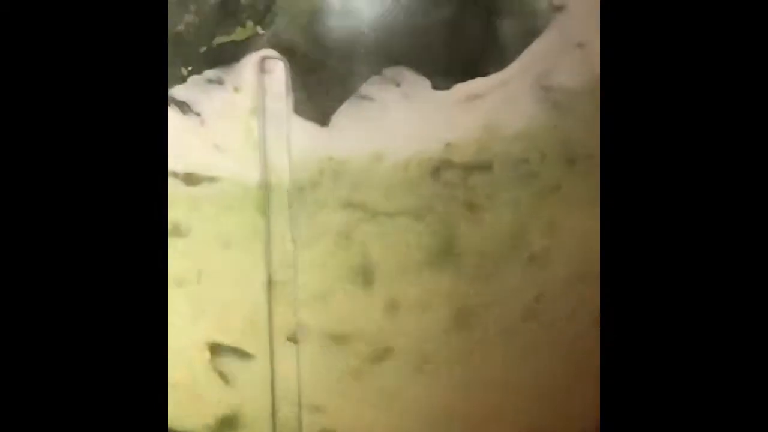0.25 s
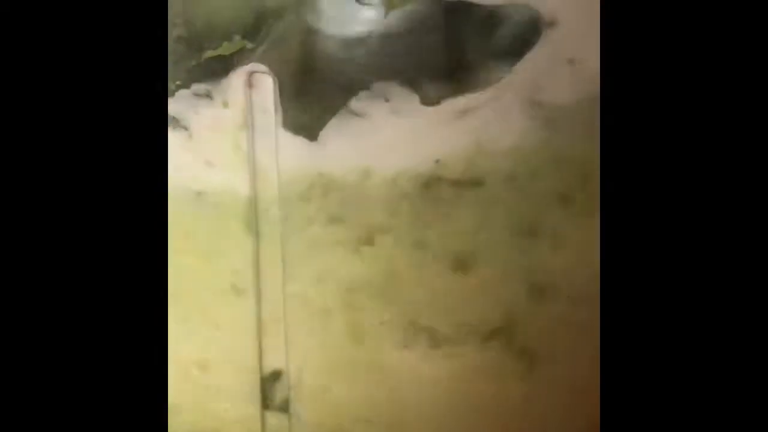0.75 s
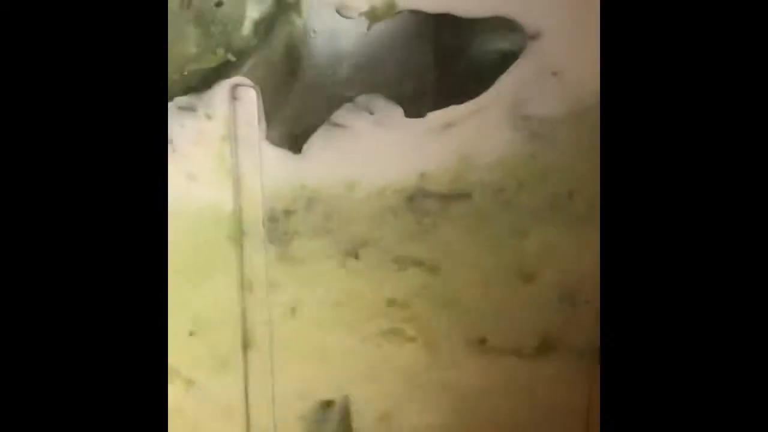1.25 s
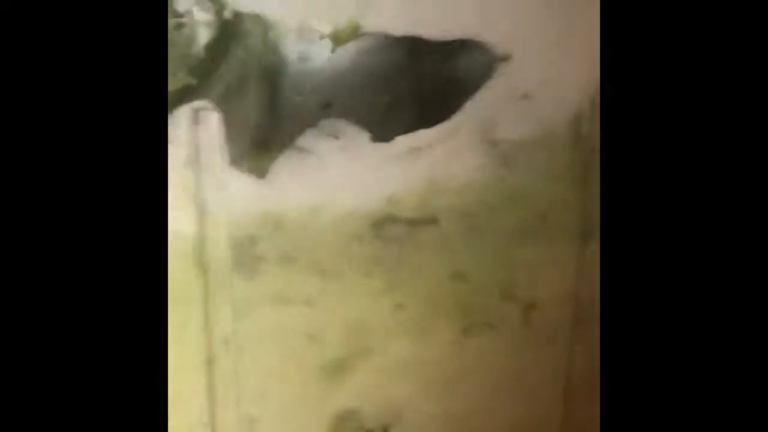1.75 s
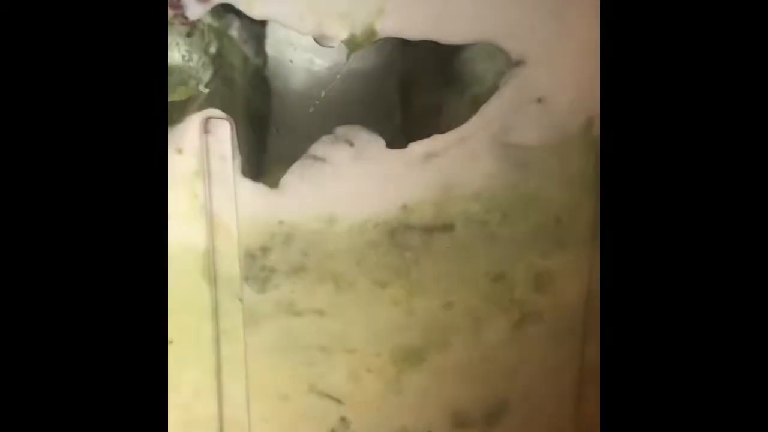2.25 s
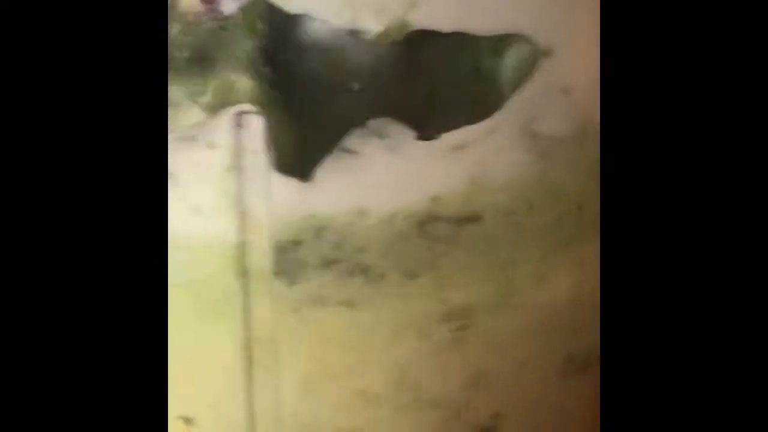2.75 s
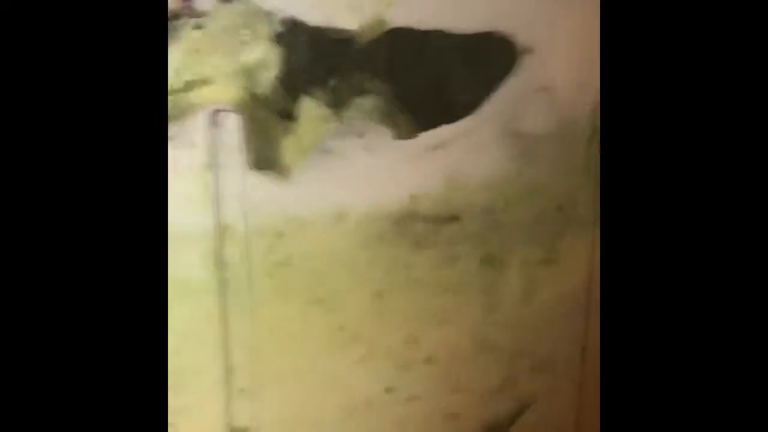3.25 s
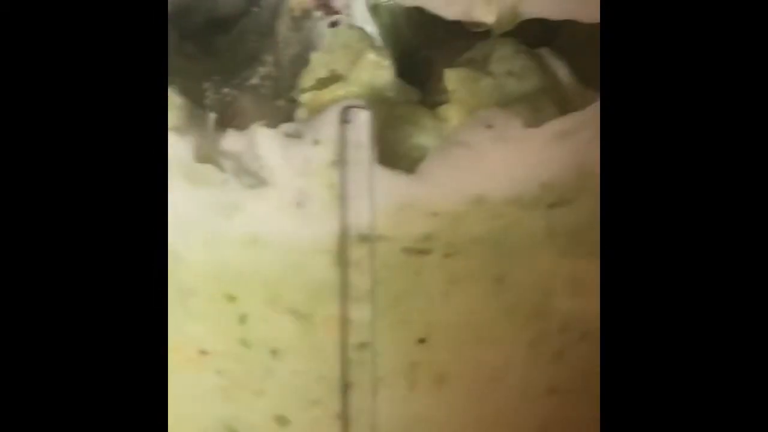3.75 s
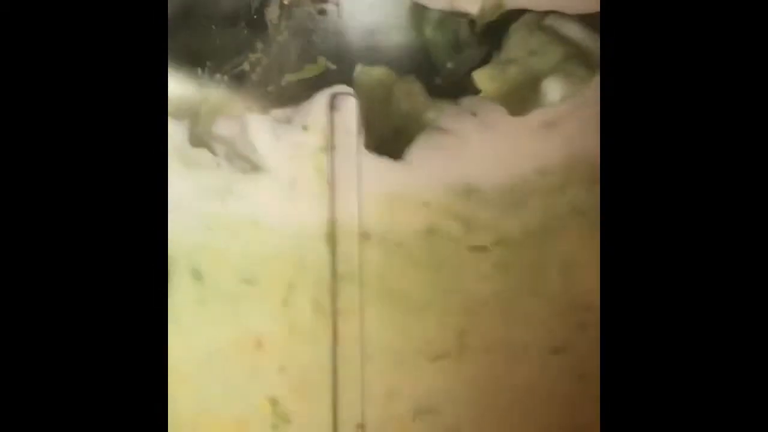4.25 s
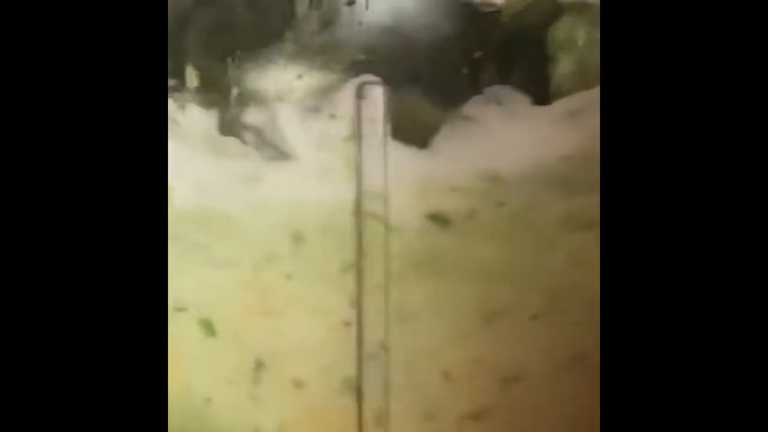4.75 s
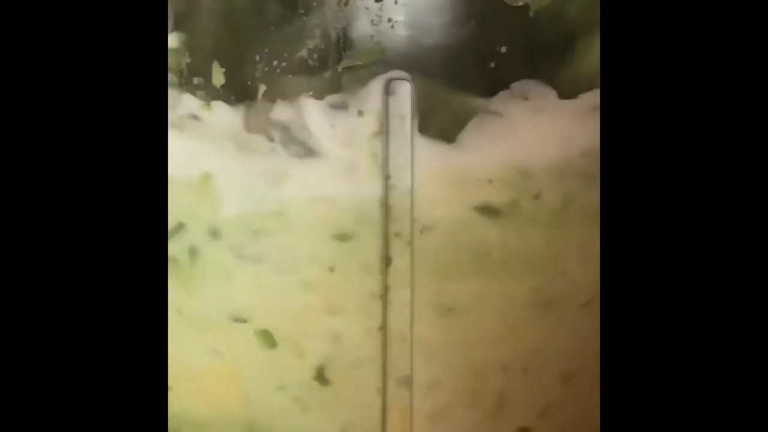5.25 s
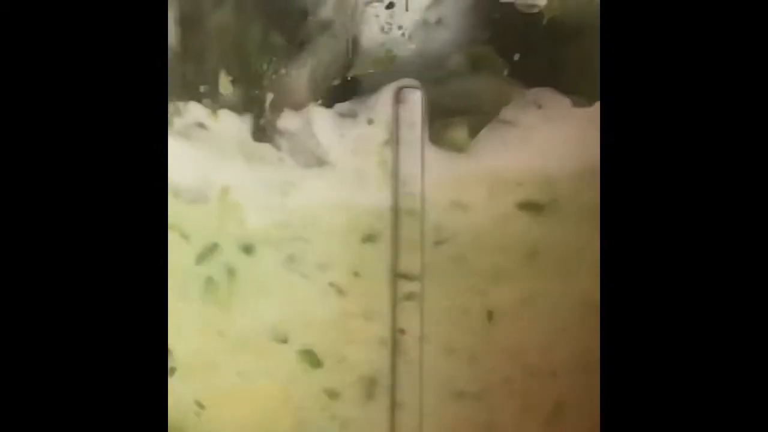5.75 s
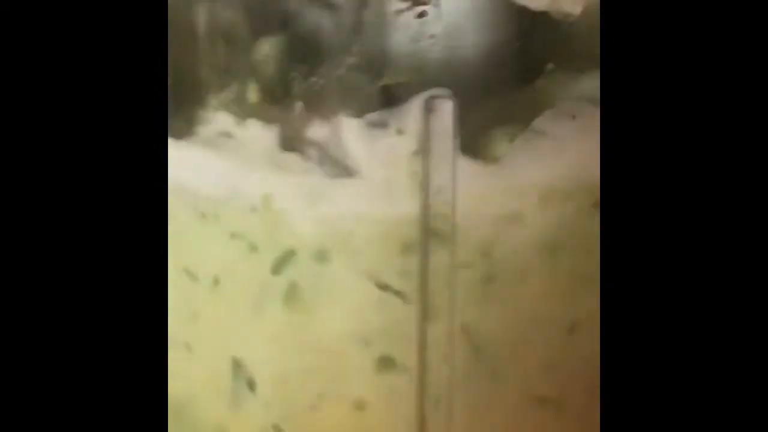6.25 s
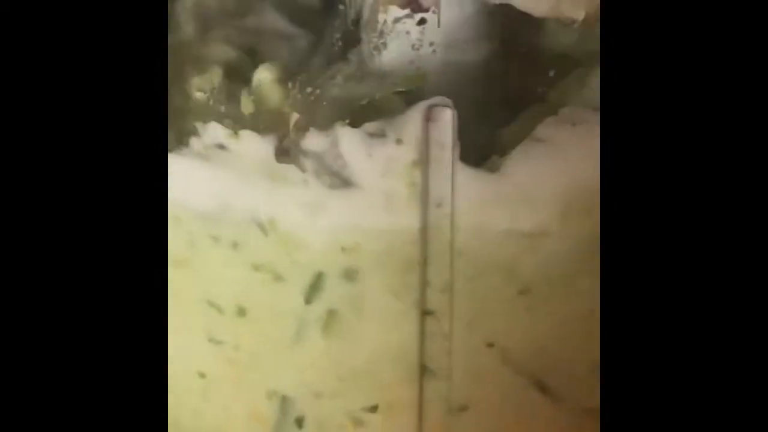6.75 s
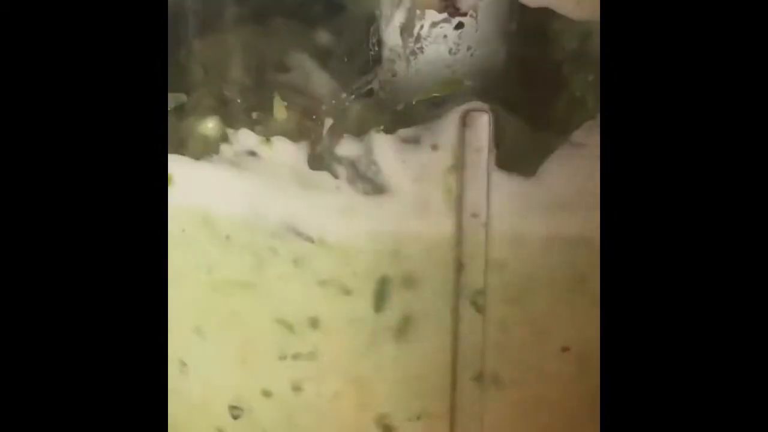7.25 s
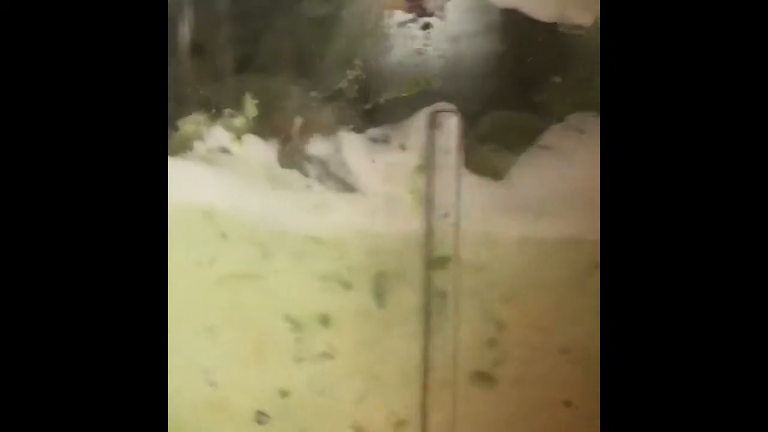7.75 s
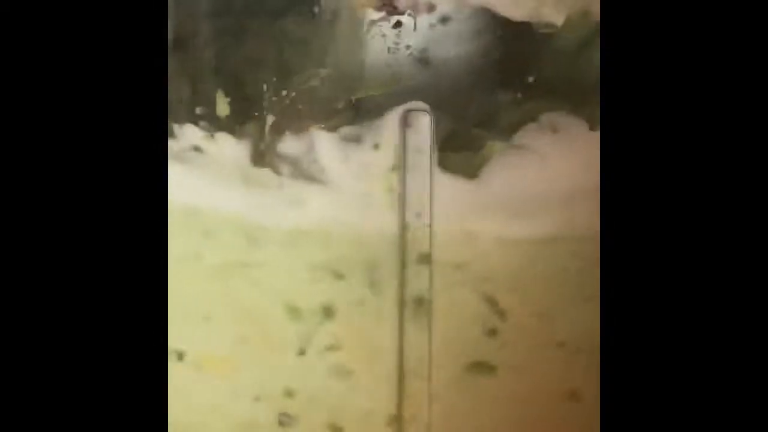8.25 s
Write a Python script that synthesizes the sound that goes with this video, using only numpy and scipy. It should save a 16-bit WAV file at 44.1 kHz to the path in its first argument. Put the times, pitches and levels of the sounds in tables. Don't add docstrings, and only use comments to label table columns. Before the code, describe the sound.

Fast repeated cord pulls on a plastic chopper, sharp clicking zips alternating with soft wet blade churn, lid rings and dull bowl thuds.

```python
import sys
import numpy as np
from scipy import signal
from scipy.fft import rfft, irfft
from scipy.io import wavfile

SR = 44100
rng = np.random.default_rng(int(sys.argv[2]) if len(sys.argv) > 2 else 0)


def bounce(signal):
    frames = np.transpose(np.atleast_2d(signal))
    limited = np.clip(frames, -1, 1)
    pcm = np.round(limited * 32767).astype(np.int16)
    wavfile.write(sys.argv[1], SR, pcm)


def amplitude_ratio(level_db):
    exponent = np.asarray(level_db, float) / 20
    return 10 ** exponent


N = 375519


def rms_one(x):
    return x / np.sqrt(np.mean(x ** 2) + 1e-20)


def coloured(x, points):
    hz, db = np.transpose(points)
    grid = np.arange(2049) * SR / 4096 + 1
    cepstrum = irfft(np.interp(np.log(grid), np.log(hz), db) * np.log(10) / 20)
    cepstrum[1:2048] *= 2
    cepstrum[2049:] = 0
    response = irfft(np.exp(rfft(cepstrum)))
    response = response / np.sqrt(np.sum(response ** 2))
    return signal.fftconvolve(x, response)[:N]


def drift(rate_hz):
    r = np.exp(-2 * np.pi * rate_hz / SR)
    settle = 9000
    noise = rng.standard_normal(N + settle)
    return rms_one(signal.lfilter([1], [1, -2 * r, r * r], noise)[settle:])


def ring(clicks, hz, width_hz):
    r = np.exp(-np.pi * width_hz / SR)
    w = 2 * np.pi * hz / SR
    return signal.lfilter([0, np.sin(w)], [1, -2 * r * np.cos(w), r * r], clicks + 1e-18)


def spikes(seconds, sizes):
    samples = np.clip(np.ravel(seconds) * SR, 0, N - 1).astype(int)
    return np.bincount(samples, np.ravel(sizes), N)


def swell(clicks, rise_s, fall_s):
    up, down = np.exp(-1 / (rise_s * SR)), np.exp(-1 / (fall_s * SR))
    return signal.lfilter([1 - up], np.convolve([1, -up], [1, -down]), clicks + 1e-18)


def hiss_ticks(seconds, db, low_hz, fall_s):
    noise = signal.lfilter(*signal.butter(2, low_hz, "high", fs=SR), rng.standard_normal(N))
    return swell(spikes(seconds, amplitude_ratio(db)), .0008, fall_s) * noise


# (f/Hz, level/dB)
HOUSING_MODES = [(310, -10.5), (530, -12.5), (680, -11), (870, -3), (1020, -6), (1310, -11.5),
                 (1650, -28.5), (2000, 1.5), (2400, -14.5), (2900, -14), (3300, -1), (3650, 6), (3950, 2.5),
                 (5300, 3), (6900, -25.5)]
# (f/Hz, level/dB per Hz)
SNAP_TONE = [(200, -38), (400, -14.5), (1000, -3), (3500, 0.5), (4400, -9.5), (5500, -7), (9500, -17.5),
             (13000, -33.5), (16000, -36.5)]


def strikes(seconds, db, dull_db, chatter_s, ring_db, snap_db, snap_s, crack_db, uneven_db, loss, count=7):
    rows, out = len(seconds), 0
    phase = rng.random((rows, count))
    shape = np.sin(np.pi * phase ** 0.87)
    shape = shape / np.linalg.norm(shape, axis=1, keepdims=True)
    for hz, mode_db in HOUSING_MODES:
        lowness = np.clip(np.log2(2000 / hz), -1, 1)
        bounces = seconds[:, None] + chatter_s * phase * (1 + 0.31 * lowness)
        uneven = uneven_db * rng.uniform(-1.32, 1, rows)
        strength = amplitude_ratio(db + mode_db + ring_db + .5 * lowness * dull_db + uneven)
        force = strength[:, None] * shape * rng.choice([-1, 1], (rows, count))
        out = out + ring(spikes(bounces, force), hz, 35 + loss * hz)

    size = amplitude_ratio(db + snap_db - 0.43 * dull_db)
    bright = spikes(seconds, size)
    rattle = amplitude_ratio(-19) * swell(bright, 0.0022, 3.65 * snap_s)
    envelope = swell(bright, 0.0013, snap_s) + rattle
    slide = amplitude_ratio(-13) * swell(spikes(seconds - .005, size), 0.008, 0.0029)
    snap = coloured((envelope + slide) * rng.standard_normal(N), SNAP_TONE)
    crack = spikes(seconds + .0005, size * amplitude_ratio(crack_db + uneven_db * rng.uniform(-1, 1, rows)))
    out = out + snap + ring(ring(crack, 7100, 2400), 9800, 2600)
    no_bass = signal.butter(2, 200, "high", fs=SR, output="sos")
    return signal.sosfilt(no_bass, out)


# (first tooth t/s, first gap/ms, travel to rest/teeth, teeth heard/count)
REWINDS = [(0.0, 8.69, 3.26, 4), (0.2138, 9.18, 6.56, 6), (0.4457, 8.62, 7.16, 7), (0.6779, 10.33, 5.96, 6),
           (0.9006, 9.79, 6.92, 6), (1.1313, 9.74, 5.86, 6), (1.3702, 11.0, 4.32, 5),
           (1.6157, 11.05, 5.86, 6), (1.9128, 10.67, 6.52, 7), (2.2474, 10.57, 6.84, 7),
           (2.6395, 10.96, 7.2, 8), (3.0317, 11.46, 7.22, 7), (3.4009, 12.16, 7.26, 6),
           (3.763, 12.52, 6.14, 7), (4.1682, 13.06, 7.06, 7), (4.558, 11.56, 6.7, 7),
           (4.9488, 11.66, 6.8, 7), (5.3375, 11.29, 6.06, 7), (5.7452, 12.82, 5.3, 6),
           (6.1293, 12.92, 5.5, 6), (6.5224, 12.94, 4.82, 5), (6.9172, 11.92, 7.44, 8),
           (7.3886, 12.24, 6.28, 7), (7.8904, 13.77, 4.48, 5), (8.2991, 12.41, 6.42, 7)]
SLOWING = 2


def tooth_times():
    share = np.linspace(0, 1, num=400)
    turned = share - share ** (SLOWING + 1) / (SLOWING + 1)
    seconds, numbers = [], []
    for start, gap_ms, travel, teeth in REWINDS:
        span = travel / turned[-1]
        k = np.arange(round(teeth))
        seconds.append(start + gap_ms / 1000 * span * np.interp(k / span, turned, share))
        numbers.append(k)
    return np.concatenate(seconds), np.concatenate(numbers)


LATE_TEETH = [
    2.3564,
    7.5253,
]
# (t/s, tooth level/dB, dullness/dB)
GRIP = [(0, 0, 3), (.7, 0, 3), (1.4, -.5, 2), (1.9, 0, -1), (2.6, 0, 0), (3.4, 0, -1), (4.2, 0, 0),
        (5, 0, -2), (5.7, 0, -4), (6.2, 1, -4), (6.9, 0, -2), (7.4, 0, -4), (7.9, 0, -1), (8.4, 0, -1)]
FIRST_TOOTH_DB, TOOTH_DB, TOOTH_SCATTER_DB = -5, -6.3, .8


def ratchet():
    s, k = tooth_times()
    s = np.append(s, LATE_TEETH)
    k = np.append(k, np.ones(len(LATE_TEETH)))
    at, grip_db, dull_db = np.transpose(GRIP)
    db = np.where(k == 0, FIRST_TOOTH_DB, TOOTH_DB) + np.interp(s, at, grip_db)
    db = db + TOOTH_SCATTER_DB * rng.standard_normal(len(s))
    return strikes(s, db, np.interp(s, at, dull_db), chatter_s=.003, ring_db=-5.5, snap_db=-4,
                   snap_s=0.0026, crack_db=-5, uneven_db=4, loss=.07)


# (clutch bites t/s, bite level/dB, full-effort churn level/dB, lull after the stop level/dB)
PULLS = [(0.0667, -9.5, -26, -44), (0.3032, -9, -29.5, -42), (0.5325, -10.5, -27.5, -40),
         (0.7603, -12.5, -30.5, -44), (0.9844, -9, -31, -45), (1.2191, -11, -31.5, -50),
         (1.4456, -11, -32.5, -47), (1.7164, -9, -32, -47), (2.0282, -16.5, -35, -55),
         (2.3564, -20, -32, -54), (2.7804, -16.5, -33.5, -62), (3.1655, -11, -32.5, -52),
         (3.5288, -10.5, -33.5, -56), (3.8937, -19.5, -28, -51), (4.3087, -13.5, -34.5, -62),
         (4.6943, -14.5, -30, -55), (5.0865, -12, -34.5, -63), (5.463, -16.5, -35.5, -58),
         (5.8685, -15, -35.5, -60), (6.2517, -11.5, -33, -56), (6.6561, -9, -37.5, -66),
         (7.0814, -16, -30.5, -62), (7.5253, -20, -34.5, -68), (8.0378, -13.5, -41, -52),
         (8.4669, -13, -30, -47)]
BITE_CHURN_DB, SAG_CHURN_DB, SAG_SHARE = -39, -40, .3
PEAK_LEAD_S, COAST_S, COAST_DROP_DB = .008, .035, 14
LULL_LEAD_S, SLACK_CHURN_DB = .015, -47


def effort_db():
    bite, _, full_db, lull_db = np.transpose(PULLS)
    peak = np.transpose(STOPS)[0] - PEAK_LEAD_S
    free, _, slack, _ = np.transpose(LETTING_GO + [(N / SR + 1,) * 4])
    stalled = peak + COAST_S
    same = np.ones(len(bite))
    s = [bite, bite + SAG_SHARE * (peak - bite), peak, stalled,
         np.maximum(free - LULL_LEAD_S, stalled + .002), slack]
    db = [BITE_CHURN_DB * same, SAG_CHURN_DB * same, full_db, np.maximum(full_db - COAST_DROP_DB, lull_db),
          lull_db, np.maximum(SLACK_CHURN_DB, lull_db)]
    return np.interp(np.arange(N) / SR, np.transpose(s).ravel(), np.transpose(db).ravel())


# (f/Hz, level/dB per Hz)
PASTE_TONE = [(35, -53), (60, -12.5), (732, 1), (1440, -8), (2050, -10), (2900, -16), (5460, -21),
              (6280, -27), (16000, -38.5)]
# (f/Hz, width/Hz, level/dB)
BOWL_MODES = [(335, 180, -4.5), (502, 240, 0), (770, 68, -8), (1240, 250, 11.5), (1810, 320, -12.5)]


def churn(per_s=900, bright_db=0.2748):
    level_db = effort_db()
    lumpy_db, patchy_db, smear, boxy = 4.0, 3, .35, .9
    born = rng.random(N) < per_s / SR
    grains = born * amplitude_ratio(lumpy_db * np.minimum(rng.exponential(1, N), 4)) * rng.choice([-1, 1], N)
    grains = rms_one(grains)

    wet = (grains + smear * rng.standard_normal(N)) * amplitude_ratio(patchy_db * drift(42))
    wet = coloured(wet, PASTE_TONE)
    body = sum(amplitude_ratio(mode_db) * ring(wet, hz, width_hz) for hz, width_hz, mode_db in BOWL_MODES)
    low = rms_one(signal.lfilter(*signal.butter(2, 2200, fs=SR), wet) + boxy * rms_one(body))

    spray = rng.standard_normal(N) * amplitude_ratio(patchy_db * drift(25)) + .5 * grains
    high = signal.lfilter(*signal.butter(2, 2200, "high", fs=SR), coloured(spray, PASTE_TONE))
    return amplitude_ratio(level_db) * (low + high * amplitude_ratio(bright_db * (level_db + 45)))


# (f/Hz, level/dB per Hz)
AIR_TONE = [(18, -34), (60, -2), (170, -2), (1700, -4.5), (2600, -7), (4200, -11.5), (10000, -23.5),
            (16000, -27)]
AIR_DB = -58
# (start t/s, end t/s, f/Hz, level/dB)
DRONE = (7.5, 7.99, 76, -54)


def background():
    start, end, hz, db = DRONE
    t = np.arange(N) / SR
    on = np.clip((t - start) / .03, 0, 1) * np.clip((end - t) / .02, 0, 1)
    drone = np.sin(2 * np.pi * hz * t) + .5 * np.sin(4 * np.pi * hz * t)
    air = coloured(rng.standard_normal(N), AIR_TONE)
    return amplitude_ratio(AIR_DB) * air + amplitude_ratio(db + 3) * on * drone


# (clutch frees t/s, level/dB, slack taken up t/s, level/dB)
LETTING_GO = [(0.1825, -30, 0.1941, -24), (0.405, -56, 0.4219, -23), (0.6441, -35, 0.6618, -24),
              (0.8553, -27.5, 0.8827, -18), (1.0991, -27.5, 1.1111, -22.5), (1.33, -56, 1.3489, -16),
              (1.5724, -31, 1.5975, -24), (1.8663, -29.5, 1.8959, -23), (2.192, -30, 2.2312, -24),
              (2.5912, -30.5, 2.6245, -24), (2.9967, -20.5, 3.0131, -25), (3.3547, -27, 3.385, -27),
              (3.6921, -32, 3.7393, -24), (4.1244, -27.5, 4.1509, -24), (4.5048, -29, 4.5439, -24),
              (4.9034, -28.5, 4.927, -21.5), (5.2836, -28, 5.3233, -23), (5.68, -30, 5.7286, -22),
              (6.0738, -29, 6.1131, -22), (6.4744, -27.5, 6.5034, -27), (6.8654, -30, 6.9024, -20),
              (7.33, -30, 7.3636, -22.5), (7.8248, -27, 7.8694, -30), (8.2266, -30, 8.2815, -20.5)]
# (t/s, level/dB, dullness/dB)
STRAYS = [(0.1123, -29, 18), (0.3419, -19.5, 20), (0.5753, -20, 23), (0.6019, -24, 3), (0.8293, -31, 11),
          (1.0237, -21, 20), (1.4932, -29, 15), (1.7786, -36, 8), (2.0892, -31, 16), (3.217, -36, 2),
          (3.9636, -30, 5), (4.0059, -16, 6), (6.3221, -34, 1), (6.6403, -19, -4), (6.7302, -31.5, 4),
          (7.0539, -33, 0), (7.0669, -25, 2), (7.57, -23.5, 1), (8.0167, -36, -1), (8.0238, -15, 2.5),
          (8.105, -37, 0), (8.12, -31, 9), (8.1301, -36, -6)]
BITE_DULL_DB = 8
FREE_DULL_DB, FREE_LEAD_S, FREE_LEAD_DB = -10, .009, -7
SLACK_DULL_DB, SLACK_LEAD_S, SLACK_LEAD_DB = 7, .008, -4
DOUBLE_FROM_S = 1.5


def contacts():
    rows = STRAYS + [(s, db, BITE_DULL_DB) for s, db, *_ in PULLS]
    for free_s, free_db, slack_s, slack_db in LETTING_GO:
        rows += [(free_s, free_db, FREE_DULL_DB), (slack_s, slack_db, SLACK_DULL_DB)]
        if free_s > DOUBLE_FROM_S:
            rows += [(free_s - FREE_LEAD_S, free_db + FREE_LEAD_DB, FREE_DULL_DB),
                     (slack_s - SLACK_LEAD_S, slack_db + SLACK_LEAD_DB, SLACK_DULL_DB)]
    return rows


# (f/Hz, width/Hz)
LID_MODES = [(1620, 66), (1740, 33)]


def lid(jerk):
    return sum(ring(jerk, hz, width_hz) for hz, width_hz in LID_MODES)


def knocks():
    s, db, dull_db = np.transpose(contacts())
    body = strikes(s, db, dull_db, chatter_s=0.0075, ring_db=-4.5, snap_db=-1,
                   snap_s=0.0023, crack_db=-28.5, uneven_db=1.5, loss=.12)
    return body + lid(spikes(s + 0.00205, amplitude_ratio(db - 14)))


# (t/s, lid ring level/dB, tick level/dB, bowl thud level/dB)
STOPS = [(0.1265, -20, -39.5, -31), (0.3592, -21, -34, -31.5), (0.5898, -14, -38, -32),
         (0.8134, -39, -42, -34), (1.0502, -14, -38, -33.5), (1.258, -26, -46.5, -46),
         (1.524, -31, -39.5, -35), (1.8006, -19, -35, -32), (2.1385, -22, -46, -33),
         (2.5174, -19, -39, -31.5), (2.9132, -14.5, -43, -32), (3.264, -15, -31.5, -30),
         (3.6423, -31, -42, -40), (3.999, -14, -34, -25), (4.4209, -29, -36, -35), (4.813, -16, -35, -29),
         (5.2091, -20, -36, -34), (5.6091, -24, -37, -33), (5.9918, -23, -40, -32),
         (6.3602, -19.5, -35, -28), (6.763, -27.5, -40.5, -36), (7.22, -19.5, -45, -30),
         (7.7134, -21.5, -37, -29.5), (8.151, -18, -44, -38), (8.486, -55, -60, -55)]
THUD_LAG_S = .007


def cord_stops():
    s, ring_db, tick_db, _ = np.transpose(STOPS)
    jerk = spikes(s[:, None] + [0, .0012, .003], amplitude_ratio(ring_db - 7)[:, None] * [1, -.8, .6])
    knock = ring(jerk, 1200, 450) * amplitude_ratio(2.5)
    return lid(jerk) + knock + hiss_ticks(s, tick_db + 10, 3500, 0.0019)


def thuds():
    stop, _, _, db = np.transpose(STOPS)
    s = stop + THUD_LAG_S
    rumble = rms_one(ring(rng.standard_normal(N), 160, 66))
    rustle = swell(spikes(s, amplitude_ratio(db - 6)), 0.0052, 0.022) * rumble
    push = swell(spikes(s + 0.0089, amplitude_ratio(db - 31)), 0.00029, 0.00072)
    return rustle + ring(push, 130, 45) + amplitude_ratio(-2.5) * ring(push, 56, 55)


# (t/s, level/dB)
SPATTER = [
    (0.4045, -36),
    (0.7632, -27),
    (1.0804, -32),
    (1.8592, -31),
    (2.8724, -29),
    (5.1527, -36),
    (6.742, -26),
    (7.1062, -34),
    (8.0755, -37),
    (8.1264, -20.5),
]


def spatter():
    s, db = np.transpose(SPATTER)
    return hiss_ticks(s, db - 7, 4700, 0.0078)


KITCHEN_T60_S, WALL_CUT_HZ, KITCHEN_DB = 0.15, 4100, -19


def kitchen(x):
    out, dull = np.zeros(N), np.exp(-2 * np.pi * WALL_CUT_HZ / SR)
    lags = (rng.uniform(.005, .022, 8) * SR).astype(int)
    for k, lag in enumerate(lags):
        loop, state = x.copy(), [0.]
        gain = amplitude_ratio(-60 * lag / SR / KITCHEN_T60_S)
        for i in range(lag, N, lag):
            back, state = signal.lfilter([gain * (1 - dull)], [1, -dull], loop[i - lag:i], zi=state)
            loop[i:i + lag] += back[:N - i]
        out += (loop - x) * (-1) ** k
    return out


TABLE_DIP_HZ, TABLE_DIP_WIDTH_HZ, TABLE_DIP_SHARE = 243, 55, .55


def scene():
    chopper = ratchet() + churn() + knocks() + cord_stops() + spatter()
    band = signal.lfilter(*signal.iirpeak(TABLE_DIP_HZ, TABLE_DIP_HZ / TABLE_DIP_WIDTH_HZ, SR), chopper)
    chopper = chopper - TABLE_DIP_SHARE * band + thuds()
    return (chopper + amplitude_ratio(KITCHEN_DB) * kitchen(chopper) + background())[None]


def top_cut(x):
    return signal.sosfilt(signal.butter(12, 16830, fs=SR, output="sos"), x)


def record(dry):
    held = 1.143 * np.tanh(dry / 1.115)
    lean = signal.sosfilt(signal.butter(4, 46, "high", fs=SR, output="sos"), held)
    cut = signal.sosfilt(signal.cheby2(10, 24, 15900, fs=SR, output="sos"), lean)
    mix = np.clip(cut, -1, 1)
    return top_cut(mix)


dry = scene()
out = record(dry)
bounce(out)
```